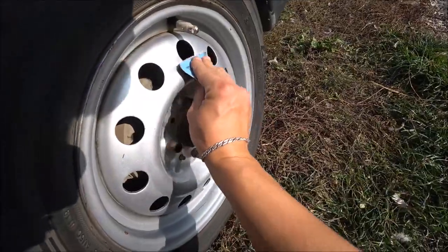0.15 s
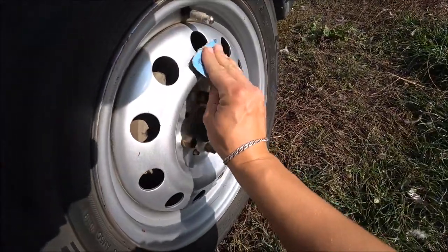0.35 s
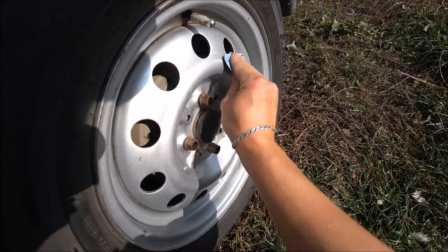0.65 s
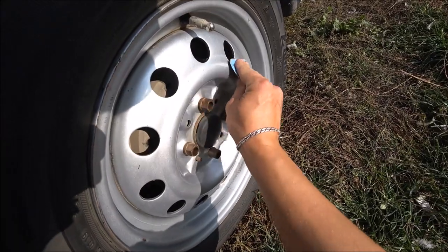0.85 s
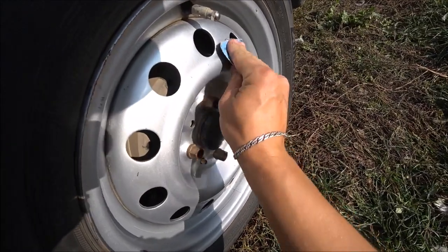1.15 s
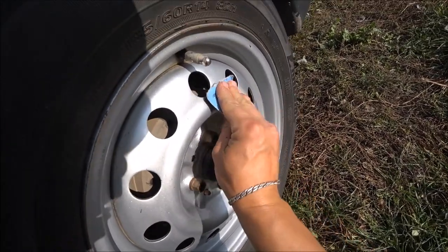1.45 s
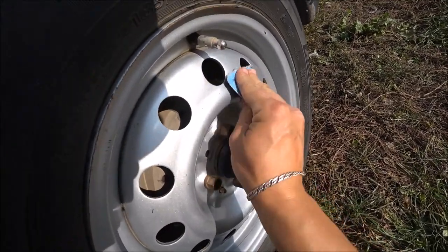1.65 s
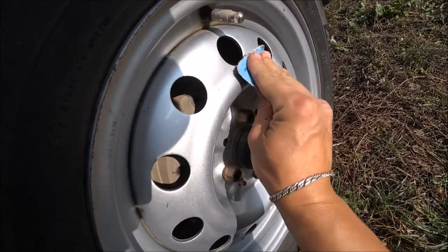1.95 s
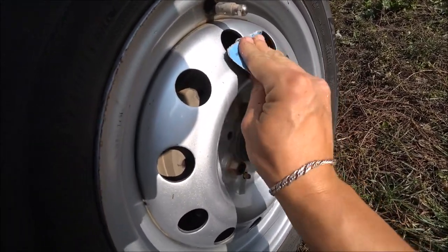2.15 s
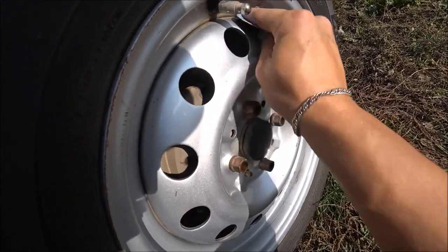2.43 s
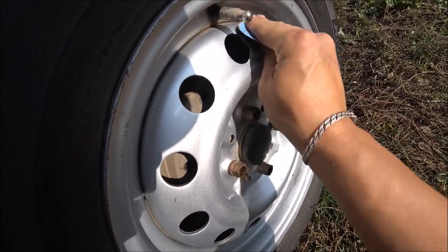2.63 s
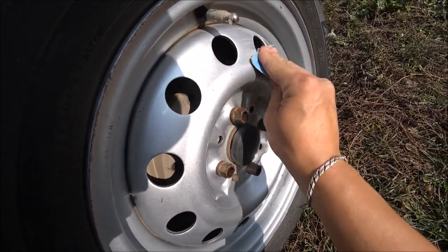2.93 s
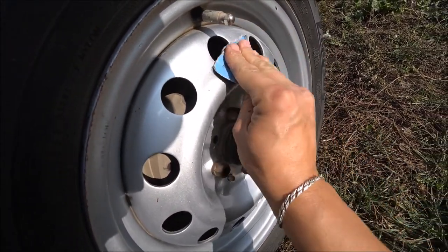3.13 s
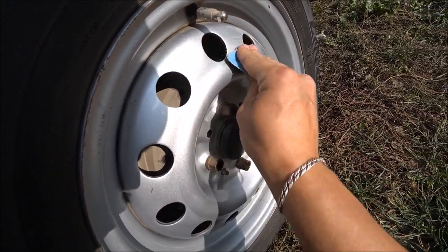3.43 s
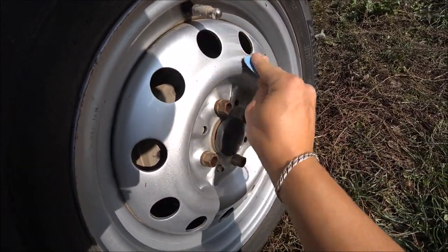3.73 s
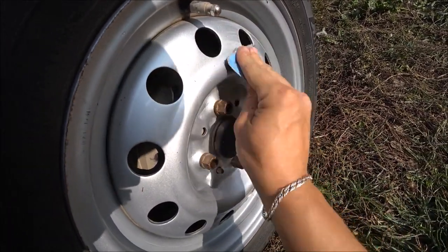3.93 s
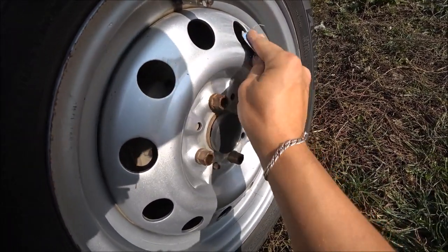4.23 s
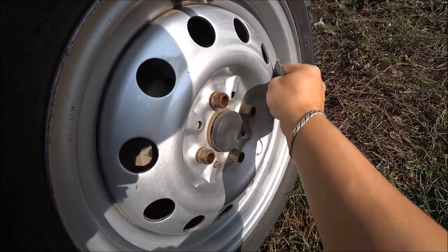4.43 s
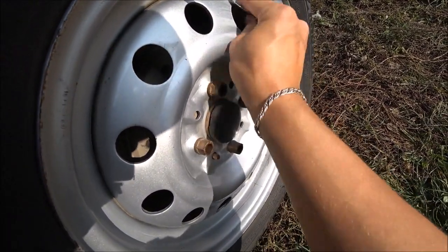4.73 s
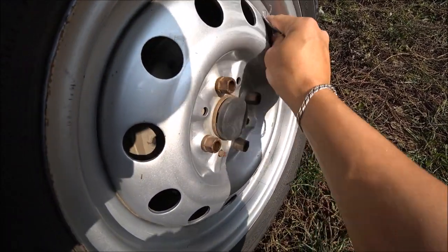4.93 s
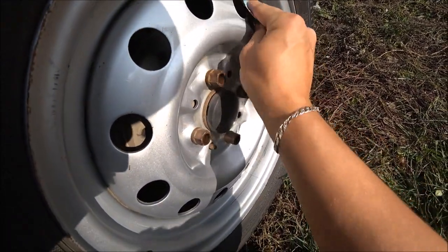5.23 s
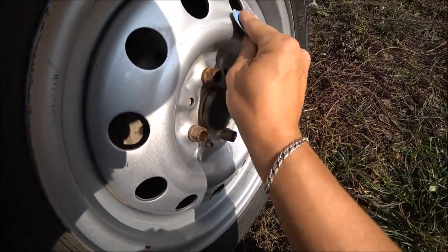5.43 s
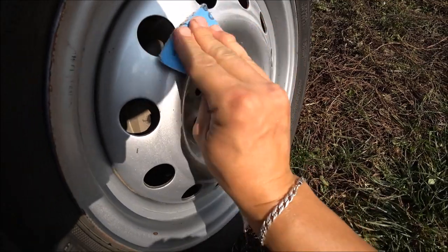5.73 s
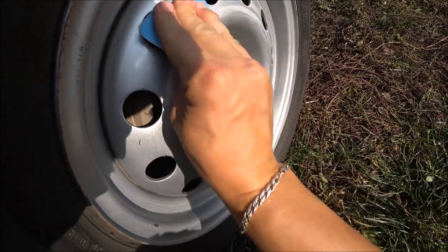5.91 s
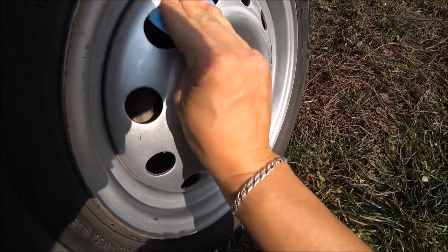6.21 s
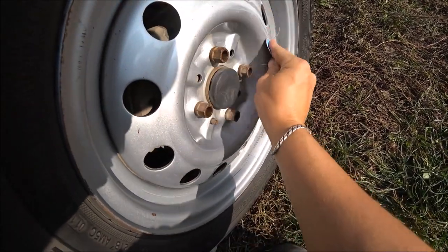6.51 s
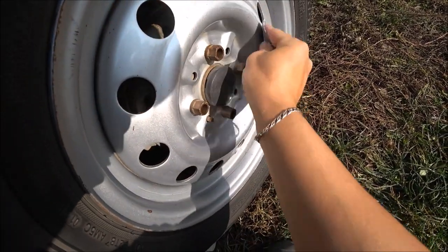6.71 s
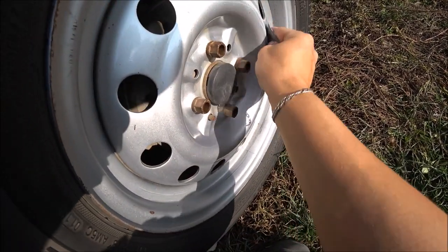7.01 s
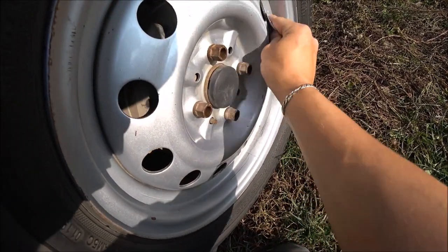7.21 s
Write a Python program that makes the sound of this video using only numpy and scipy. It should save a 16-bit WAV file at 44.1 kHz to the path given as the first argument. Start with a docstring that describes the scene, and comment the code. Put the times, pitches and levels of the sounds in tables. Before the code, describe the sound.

A single hard tap rings briefly on a steel car wheel at the very start. Sandpaper then rubs over it by hand, close to a stereo microphone, in quick, uneven back-and-forth strokes, roughly eight a second. The sound is a bright, gritty hiss with a coarser rasp, a light paper rustle and a faint ring from the hand-damped steel. Sharp little ticks come as the paper snags, several in the first 1.5 seconds. The strokes get stronger around 3 seconds. Short, duller scuffs over the edges of holes stand out near 2.9, 4.4, 5.4 and 6.1 seconds. The sanding falters and rustles briefly around 4.5 to 4.7 seconds, then resumes. The sharpest cluster of snags comes between 6.5 and 7 seconds, before the rubbing eases at about 7.3 seconds. Throughout, far traffic rumbles very quietly under a faint hush of open air.

```python
"""Sandpaper rubbed by hand to and fro over a steel car wheel, outdoors, close to a stereo microphone.
Grit catches in dense grains that swell with each stroke: fine grit hisses, coarse grit rasps, the sheet
rustles. The paper snags, scuffs over the edges of the holes and sets the steel faintly ringing.
One hard tap sounds at the start. Far off, traffic rumbles under a faint hush of open air."""
import sys
import numpy as np
from scipy import signal
from scipy.io import wavfile
from scipy.ndimage import uniform_filter1d

SR = 44100
rng = np.random.default_rng(int(sys.argv[2]) if len(sys.argv) > 2 else 0)


def to_wav(sig):
    """Store sig (one row per channel, or 1-D mono) as 16-bit WAV at the path in sys.argv[1].

    Samples outside -1..1 are clipped; the rate is SR.
    """
    pcm = np.clip(np.atleast_2d(sig), -1, 1) * 32767
    pcm = np.round(pcm).astype(np.int16)
    wavfile.write(sys.argv[1], SR, pcm.T)  # frames by channels


N = 324556
TIME = np.arange(N) / SR
MIC_TOP_HZ, MIC_STOP_HZ = 10980, 12360
HAND_DAMPING = .65   # share of the ring time left while the hand presses on the steel


def amp(db):
    """Decibels to gain."""
    return 10 ** (np.asarray(db) / 20)


def rms_one(x):
    """Scale to rms 1."""
    return x / np.sqrt(np.mean(x ** 2) + 1e-20)


def at_hz(points, hz):
    """Read a spectrum on a log-frequency axis."""
    freqs, levels_db = np.transpose(points)
    return np.interp(np.log(hz), np.log(freqs), levels_db)


def drift(rate_hz):
    """A smooth random wander of rms 1."""
    pole = np.exp(-2 * np.pi * rate_hz * 20 / SR)   # one step every 20 samples
    slow = signal.lfilter([1], [1, -2 * pole, pole * pole], rng.standard_normal(N // 20 + 3002))[3000:]
    return np.interp(np.arange(N) / 20, np.arange(len(slow)), rms_one(slow))


def band(x, low_hz, high_hz):
    """Butterworth band-pass."""
    return signal.sosfilt(signal.butter(2, [low_hz, high_hz], "band", fs=SR, output="sos"), x)


# stereo width at the microphone: f/Hz, side re mid/dB
STEREO_WIDTH = [(60, -22), (170, -11.5), (400, 0), (1400, -3.5), (5000, -11)]
# balance at the microphone: f/Hz, left re right/dB
STEREO_BALANCE = [(1000, 0), (4000, -1), (9000, -1.8)]
def spread(mid, side, hz):
    """Left and right from mid and side; the treble leans slightly right."""
    lean = amp(at_hz(STEREO_BALANCE, hz) / 2)
    return (mid + amp(at_hz(STEREO_WIDTH, hz)) * side * [[1], [-1]]) * [[lean], [1 / lean]]


def coloured(source, spectrum, low_hz, high_hz, flicker_db, per_octave=3):
    """Narrow bands of a source, each flickering about a spectrum (f/Hz, level/dB); rms 1."""
    out, edges = 0, np.geomspace(low_hz, high_hz, 1 + round(per_octave * np.log2(high_hz / low_hz)))
    for k, (low, high) in enumerate(zip(edges, edges[1:])):
        mid, side = band(source[k % 2], low, high)   # neighbouring bands are unrelated
        hz = np.sqrt(low * high)
        out = out + amp(at_hz(spectrum, hz) + flicker_db * drift(10.4)) * spread(mid, side, hz)
    return rms_one(out)


# traffic in the distance: t/s, deep rumble/dB, engine drone/dB
TRAFFIC = [(0, -56, -58), (.7, -50.5, -61), (1.6, -57, -59), (2.1, -49.5, -57), (2.9, -52, -53),
           (3.6, -52, -55.5), (4.3, -57, -48), (5.0, -56, -49), (5.9, -56.5, -51), (6.5, -60.5, -58),
           (7.36, -60, -60)]
def outdoors():
    """Far traffic reaches the microphone as a rumble and an engine drone, with a faint wide hush of air."""
    s, rumble_db, drone_db = np.transpose(TRAFFIC)
    white = rng.standard_normal((2, 2, N))
    rumble = coloured(white, [(20, -7), (70, -9.5)], 24, 68.2, flicker_db=-0.5)
    drone = coloured(white, [(80, 8), (100, 0.5), (250, -8)], 83.3, 269.5, flicker_db=3.5)
    air = coloured(white, [(250, -0.5), (450, -4), (4000, -5.5)], 257.4, 4530, flicker_db=5)
    traffic = amp(np.interp(TIME, s, rumble_db)) * rumble + amp(np.interp(TIME, s, drone_db)) * drone
    return traffic + amp(-53) * air


# modes of the steel wheel: f/Hz, level when rubbed/dB, level when tapped/dB, t60/s
WHEEL_MODES = [(812, -4, -30, .05), (1250, -4, -30, .03), (1480, 0, -30, .05), (1820, -22, -6, .35),
               (1992, -19, -8, .2), (2280, -12, -9, .15), (3284, -10, -2, .22), (3865, -4, -1, .15),
               (4000, -9, 0, .2), (4740, -5, -20, .12), (4880, -3, -12, .15), (5443, 2, -8, .19),
               (5827, -2, -20, .12), (7829, -3, -20, .1)]
def wheel(force, tapped=False, wander_db=0, damping=1):
    """A force rings the modes of the steel; each answers more or less as the contact wanders."""
    out = 0
    for hz, rubbed_db, tapped_db, t60 in WHEEL_MODES:
        pole, angle = amp(-60 / (damping * t60 * SR)), 2 * np.pi * hz / SR
        gain = amp(tapped_db if tapped else rubbed_db) * np.sin(angle)
        drive = force * amp(wander_db * drift(0.92)) + 1e-18
        out = out + signal.lfilter([0, gain], [1, -2 * pole * np.cos(angle), pole * pole], drive)
    return out


def tap(at_s=0.0073):
    """Something hard strikes the steel once and leaves it ringing."""
    force = np.zeros(N)
    force[round(at_s * SR)] = amp(-39)
    return wheel(force, tapped=True)


# how freely the steel rings under the hand: t/s, level/dB
FREE_RING = [(0, -4), (2.3, -3), (3.8, -4.5), (5.8, -2.5), (6.3, -4.5), (7.36, 3.5)]
def rub_ring(strength, grains):
    """Passing grit keeps the hand-damped wheel faintly ringing, a little to the right."""
    ring = wheel(strength * grains, wander_db=3, damping=HAND_DAMPING)
    ring *= np.std(strength) / np.std(ring)
    ring *= amp(np.interp(TIME, *np.transpose(FREE_RING)) - 7.5)
    return ring * amp([[-1], [1]])


def bursts(events, below, above, rise, abruptness, side_db=0, first_grain_db=-40):
    """Short bursts of grains; below and above scale each width (default one octave) to the band edges."""
    out, size = np.zeros((2, N)), 4000
    for s, peak_db, hz, length_s, *width in events:
        octaves = max(width[0], .3) if width else 1
        grains = rng.standard_normal((2, size)) * rng.exponential(1, size)
        age = np.arange(size) / (length_s * SR)
        grains *= np.minimum(age / rise, 1) * np.exp(-age ** abruptness)
        grains[0, 0] = amp(first_grain_db)
        mid, side = band(grains, hz / 2 ** (below * octaves), min(hz * 2 ** (above * octaves), MIC_TOP_HZ))
        burst = amp(peak_db) / np.abs(mid).max() * spread(mid, amp(side_db) * side, hz)
        at = round(s * SR)
        out[:, at:at + size] += burst[:, :N - at]
    return out


# the sheet crossing the edge of a hole: t/s, peak/dB, f/Hz, length/s, width/octaves
SCUFFS = [(0.095, -35.5, 436, 0.0081, 1.2), (1.189, -44.5, 344, 0.044, 2.1), (2.288, -36, 1510, 0.032, 3.1),
          (2.77, -30, 1430, 0.025, 2.3), (2.858, -19, 1320, 0.022, 1.83), (3.325, -26.5, 1260, 0.038, 2.5),
          (3.915, -30.5, 1420, 0.029, 2.5), (4.056, -28.5, 1219, 0.029, 1.2),
          (4.197, -24.5, 870, 0.022, 3.2), (4.389, -17.5, 1170, 0.018, 3.4), (4.62, -34, 770, 0.031, 1.8),
          (4.728, -32.5, 910, 0.018, 1.6), (5.036, -34, 1090, 0.019, 1.3), (5.247, -37.5, 830, 0.012, 0.97),
          (5.368, -18, 1260, 0.011, 3.1), (5.745, -34, 1800, 0.015, 1.5), (6.1, -25, 1080, 0.033, 3.6),
          (6.118, -21, 1220, 0.026, 2.8), (6.54, -28, 1463, 0.0055, 0.4), (6.597, -31.5, 1220, 0.021, 2.4),
          (6.768, -33, 940, 0.007, 0.78), (6.89, -34, 1220, 0.016, 0.56), (6.955, -35.5, 1496, 0.011, 1.3),
          (7.011, -27.5, 1510, 0.0051, 0.29), (7.059, -33, 900, 0.0054, 0.7)]
def scuffs():
    """Each scuff comes from one spot, so is narrower in stereo, and shakes the steel too."""
    scrape = bursts(SCUFFS, below=0.51, above=0.44, rise=0.32, abruptness=1.37, side_db=-4)
    return scrape + amp(-35) * wheel(scrape.mean(axis=0), damping=HAND_DAMPING)


# the paper catching on the steel: t/s, peak/dB, f/Hz, length/s
SNAGS = [(0.003, -21, 4070, 0.023), (0.178, -15.5, 7600, 0.003), (0.316, -16, 6600, 0.0049),
         (0.3915, -16.5, 8360, 0.0086), (0.5195, -19, 4600, 0.0044), (0.5911, -17, 7840, 0.0087),
         (0.845, -13.5, 4700, 0.0028), (1.0236, -6.5, 8500, 0.0013), (1.124, -17, 7100, 0.011),
         (1.3755, -19, 7430, 0.0078), (2.537, -20, 7400, 0.0058), (2.626, -23, 7500, 0.0087),
         (2.7846, -11, 9400, 0.0076), (2.8345, -17, 7900, 0.0035), (3.1677, -16, 7200, 0.0016),
         (4.0562, -19.5, 3500, 0.016), (4.3595, -22, 7300, 0.0027), (4.364, -9.5, 7700, 0.0021),
         (4.3909, -17.5, 4170, 0.017), (4.5471, -27.5, 4500, 0.0049), (4.7285, -20, 6550, 0.012),
         (4.932, -12, 7100, 0.0013), (5.3717, -6.5, 5220, 0.0023), (6.5326, -5.5, 4860, 0.0027),
         (6.537, -10, 6680, 0.0035), (6.546, -6, 4840, 0.012), (6.7526, -11.5, 4550, 0.018),
         (6.9197, -12, 7200, 0.0041), (6.924, -10, 6200, 0.0014), (7.0045, -17, 7220, 0.0031),
         (7.1901, -11.5, 6500, 0.001)]
def snags():
    """The paper snags in bright ticks: the first grain bites hardest and the burst stops short."""
    return bursts(SNAGS, below=0.34, above=0.73, rise=0.027, abruptness=6.2, first_grain_db=18)


# the hollow under the cupped hand: t/s, f/Hz, level re coarse grit/dB
HAND_HOLLOW = [(0, 3610, -33), (.55, 2720, -14), (1.799, 2646, -15), (2.399, 4130, -21), (3.499, 5140, -9),
               (3.98, 4900, -46), (4.06, 3500, 4), (4.2, 3400, -7.5), (4.31, 5120, -13), (4.399, 4120, -1),
               (4.698, 4010, 0), (5.099, 4450, -30), (5.499, 3670, -17), (6.498, 4185, -4.5),
               (7.36, 4100, -8)]
def hollow(grains, width_hz):
    """A resonance that moves with the hand: a low band of grains shifted up to the moving centre."""
    s, hz, level_db = np.transpose(HAND_HOLLOW)
    slow = signal.sosfilt(signal.butter(2, width_hz / 2, fs=SR, output="sos"), grains)
    phase = 2 * np.pi * np.cumsum(np.interp(TIME, s, hz)) / SR
    return amp(np.interp(TIME, s, level_db)) * rms_one(slow * np.sin(phase)) * amp([[-1], [1]])


# a dull gap in the scratch: t/s, f/Hz, depth/dB
SCRATCH_GAP = [(0.3, 3620, -3), (1.5, 3380, -2), (3.2, 2860, -8.5), (4.1, 2120, -8.5), (5.8, 2829, -4.5),
               (6.799, 2220, -12), (7.36, 2520, -4)]
def gap(scratch, q=4, block=512):
    """A notch in the spectrum that moves with the hand, stepped in short blocks."""
    s, hz, depth_db = np.transpose(SCRATCH_GAP)
    out, state = np.zeros_like(scratch), np.zeros((2, 2))
    for i in range(0, N, block):
        angle = 2 * np.pi * np.interp(i / SR, s, hz) / SR
        cut = amp(np.interp(i / SR, s, depth_db) / 2)
        width = np.sin(angle) / (2 * q)
        b = [1 + width * cut, -2 * np.cos(angle), 1 - width * cut]
        a = [1 + width / cut, -2 * np.cos(angle), 1 - width / cut]
        out[:, i:i + block], state = signal.lfilter(b, a, scratch[:, i:i + block], zi=state)
    return out


def grit(per_s, size_db):
    """Grains of uneven size catch at random; two unrelated sets of mid and side."""
    sizes = amp(size_db * np.minimum(rng.exponential(1, (2, 1, N)), 5))
    caught = rng.random((2, 1, N)) < per_s / SR
    return rng.standard_normal((2, 2, N)) * sizes * caught


# strokes, each lasting until the next: t/s, level at the turn/dB, fastest point/0-1, fine grit/dB
STROKES = [(0.0, -56, 0.9, -47), (0.126, -50, 0.43, -36), (0.221, -45, 0.5, -42.5),
           (0.27, -56, 0.57, -38.5), (0.312, -41, 0.43, -32), (0.37, -57, 0.51, -31),
           (0.468, -55, 0.55, -31.5), (0.577, -56, 0.56, -30.5), (0.679, -55, 0.43, -32.5),
           (0.78, -52, 0.46, -31), (0.888, -44, 0.57, -32), (0.998, -45, 0.42, -32),
           (1.111, -43.5, 0.54, -31.5), (1.234, -47, 0.34, -32.5), (1.36, -44, 0.62, -31.5),
           (1.486, -46, 0.36, -31.5), (1.592, -40, 0.55, -31.5), (1.723, -34.5, 0.28, -32.5),
           (1.829, -43.5, 0.6, -27), (1.965, -52, 0.41, -30.5), (2.086, -42, 0.44, -27.5),
           (2.214, -55, 0.49, -28.5), (2.392, -38, 0.62, -33.5), (2.529, -50, 0.36, -34.5),
           (2.617, -51, 0.55, -33), (2.726, -48, 0.44, -30.5), (2.824, -57, 0.43, -24.5),
           (2.926, -39, 0.54, -24), (3.013, -50, 0.48, -25.5), (3.134, -55, 0.6, -26.5),
           (3.248, -42.5, 0.48, -29), (3.385, -45, 0.25, -28.5), (3.492, -38.5, 0.3, -28.5),
           (3.728, -37.5, 0.63, -31), (3.839, -35, 0.59, -28), (4.053, -37.5, 0, -27),
           (4.114, -34, 0.58, -32.5), (4.278, -39, 0.31, -30), (4.435, -38, 0.76, -36.5),
           (4.517, -47, 0.1, -72), (4.537, -63, 0.7, -36.5), (4.681, -50, 0.4, -47),
           (4.721, -68, 0.44, -29.5), (4.869, -55, 0.42, -31.5), (4.993, -47, 0.53, -29.5),
           (5.106, -64, 0.43, -31.5), (5.206, -55, 0.58, -29.5), (5.319, -40, 0.39, -30.5),
           (5.406, -47, 0.4, -26.5), (5.574, -38.5, 0.68, -29.5), (5.73, -43, 0.28, -30),
           (5.841, -33, 0.13, -29.5), (5.964, -33.5, 0.64, -30), (6.164, -33, 0.76, -29),
           (6.313, -30, 0.17, -30), (6.432, -39.5, 0.66, -25), (6.522, -29.5, 0.55, -24.5),
           (6.637, -48, 0.59, -33), (6.745, -36.5, 0.4, -22), (6.788, -48, 0.03, -28.5),
           (6.829, -63, 0.56, -26.5), (6.993, -73, 0.31, -29), (7.122, -43, 0.32, -34),
           (7.171, -78, 0.31, -31.5), (7.315, -52, 0.62, -43)]
def hand(plateau=1.136, lull_power=1.76):
    """Scratch strength follows hand speed, which levels off mid-stroke and sinks at every turn."""
    start, turn_db, fastest, fine_db = np.transpose(STROKES)
    stroke = np.searchsorted(start, TIME, side="right") - 1
    lengths = np.diff(start, append=N / SR)
    skew = np.log(.5) / np.log(np.clip(fastest[stroke], .1, .9))
    along = ((TIME - start[stroke]) / lengths[stroke]) ** skew
    speed = (np.tanh(plateau * np.abs(np.sin(np.pi * along))) / np.tanh(plateau)) ** lull_power
    turning = amp(np.interp(TIME, start, turn_db))   # the paper never quite stops
    return turning * (1 - speed) + amp(fine_db[stroke]) * speed


# spectrum of grit on steel: f/Hz, level per Hz/dB
SCRATCH_SPECTRUM = [(350, -43), (600, -20), (800, -10.5), (950, -13.5), (1300, -8.5), (1550, -9),
                    (1850, -10.5), (2300, -4.5), (2800, -5), (3400, -7), (4000, -3.5), (5500, -1),
                    (7000, 4.5), (11000, 1)]
# how the sheet lies on the wheel: t/s, coarse grit/dB, rustle/dB (both re fine grit at median strength)
GRIP = [(0, -7, -17), (.3, -10.5, -20), (1.8, -7.5, -16), (2.65, -6.5, -16.5), (2.86, -5.5, -10.5),
        (3.05, -7, -21.5), (3.6, -8.5, -13), (3.95, -8, -18.5), (4.1, -4.5, -13), (4.35, -4.5, -14),
        (4.55, -1, 3.5), (4.8, -9, -16), (5.25, -1.5, -11), (5.5, -8, -15.5), (6.451, -6.5, -15),
        (6.75, -2.5, -8), (6.9, -4, -11), (7.36, -5, -11.5)]
def sanding():
    """Close up, fine grit hisses, coarse grit rasps, the sheet rustles; pressure wavers in all at once."""
    s, coarse_db, rustle_db = np.transpose(GRIP)
    strength = hand()
    evening_out = (strength / np.median(strength)) ** -0.2   # rasp and rustle swell less than the hiss
    strength *= amp(1.2 * drift(25) + 1.1 * drift(200))
    grains = grit(per_s=14000, size_db=1.5)
    hiss = coloured(grains[::-1], SCRATCH_SPECTRUM, 5500, 12500, flicker_db=2.1, per_octave=10)
    rasp = coloured(grains, SCRATCH_SPECTRUM, 2500, 5500, flicker_db=4.2, per_octave=10)
    rasp += hollow(grains[1, 1], width_hz=850)
    rasp *= amp(np.interp(TIME, s, coarse_db))
    rustle = coloured(grains[::-1], SCRATCH_SPECTRUM, 350, 2500, flicker_db=4.5, per_octave=8)
    rustle *= amp(np.interp(TIME, s, rustle_db))
    scratch = strength * (hiss + evening_out * (rasp + rustle))
    return gap(scratch) + rub_ring(strength, grains[0, 1])


def scene():
    """At the microphone: the work on the wheel in front, the traffic far behind."""
    return snags() + scuffs() + sanding() + tap() + outdoors()


def record(dry):
    """The microphone path ends steeply in the treble."""
    rolled = signal.sosfilt(signal.ellip(8, .3, 40, MIC_TOP_HZ, fs=SR, output="sos"), dry)
    return signal.sosfilt(signal.cheby2(12, 40, MIC_STOP_HZ, fs=SR, output="sos"), rolled)


dry = scene()
out = record(dry)
to_wav(out)
```